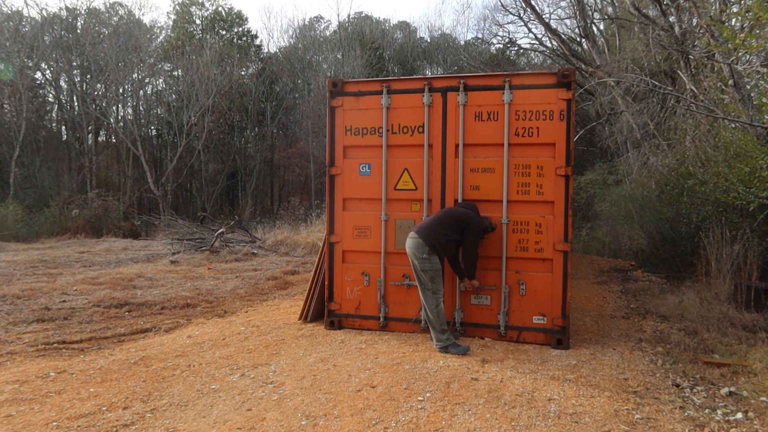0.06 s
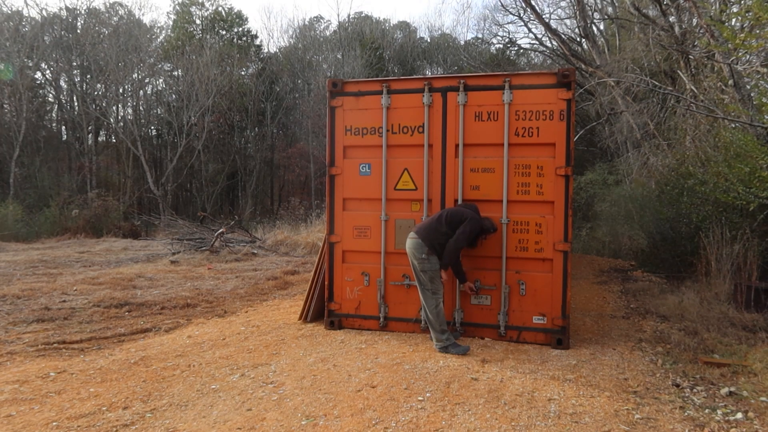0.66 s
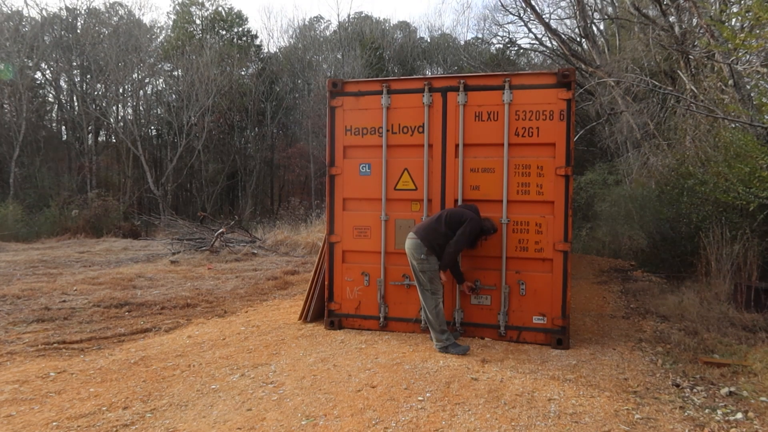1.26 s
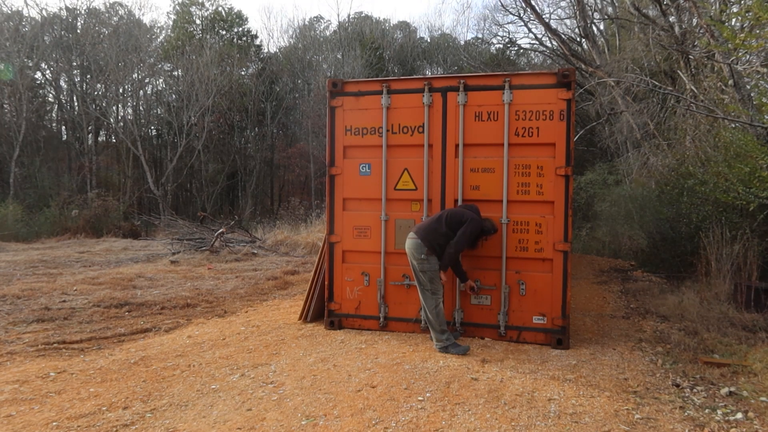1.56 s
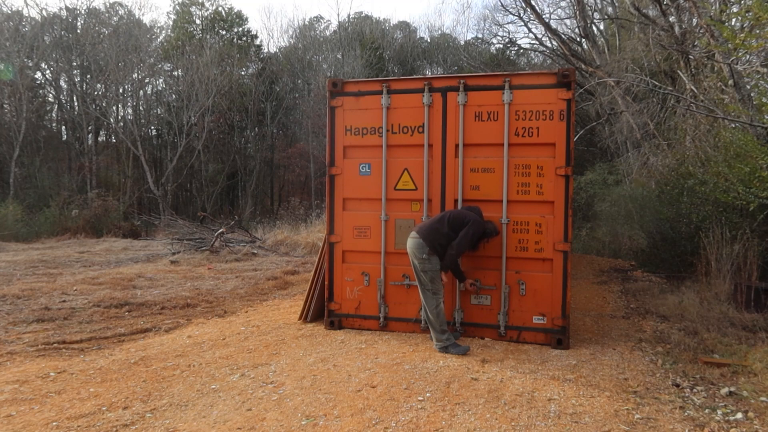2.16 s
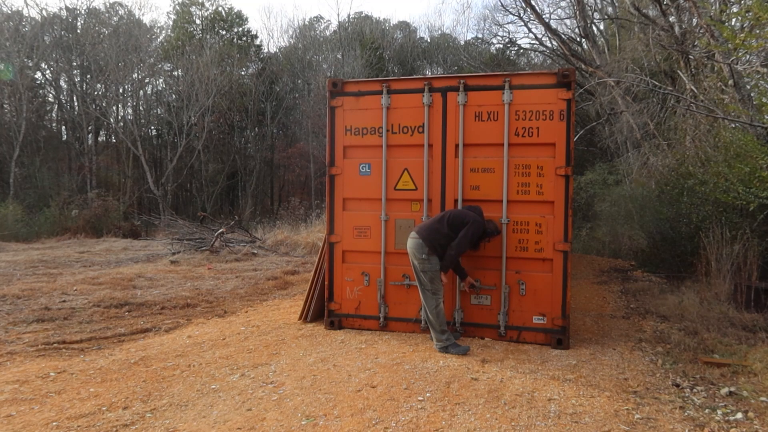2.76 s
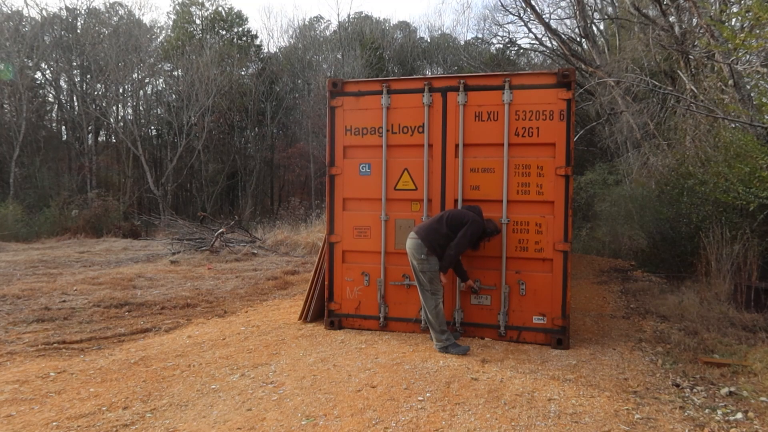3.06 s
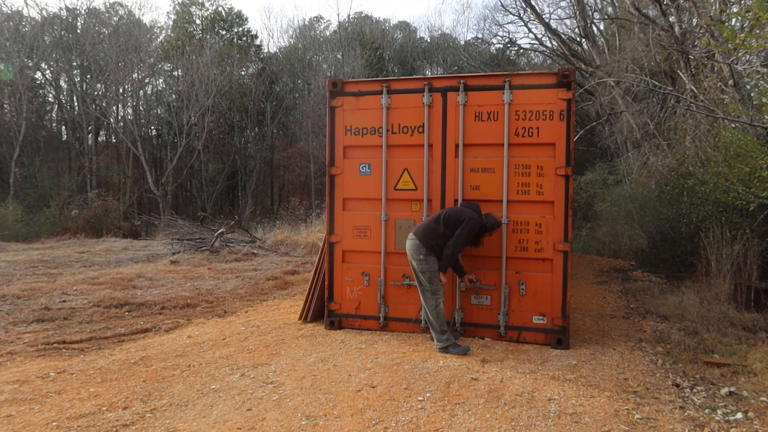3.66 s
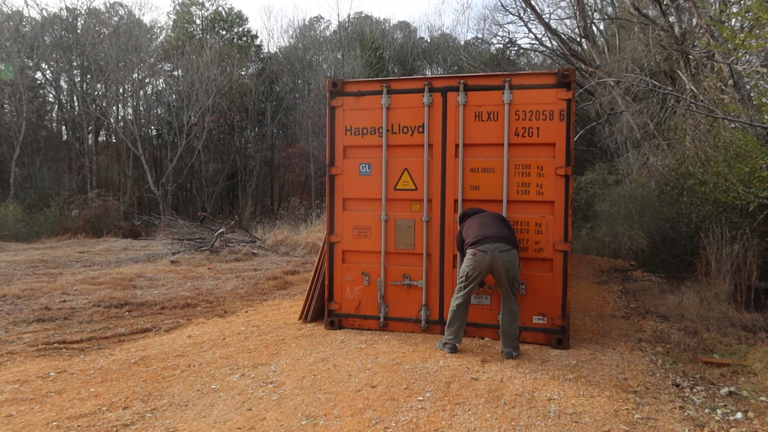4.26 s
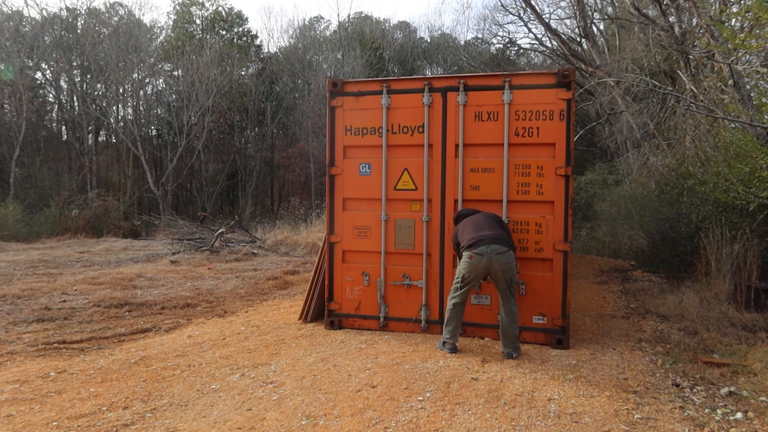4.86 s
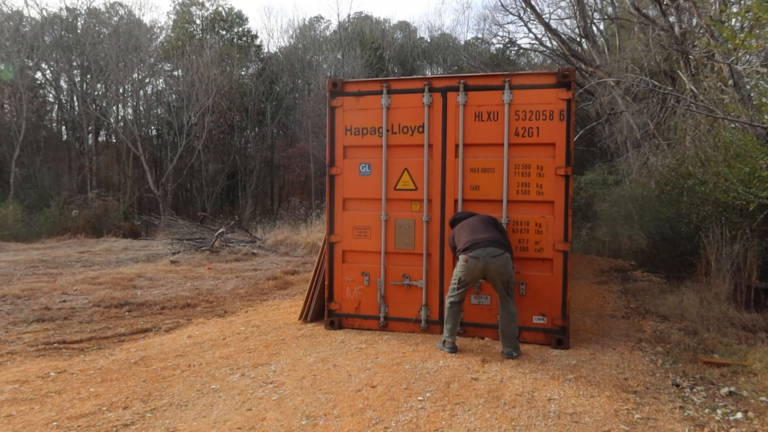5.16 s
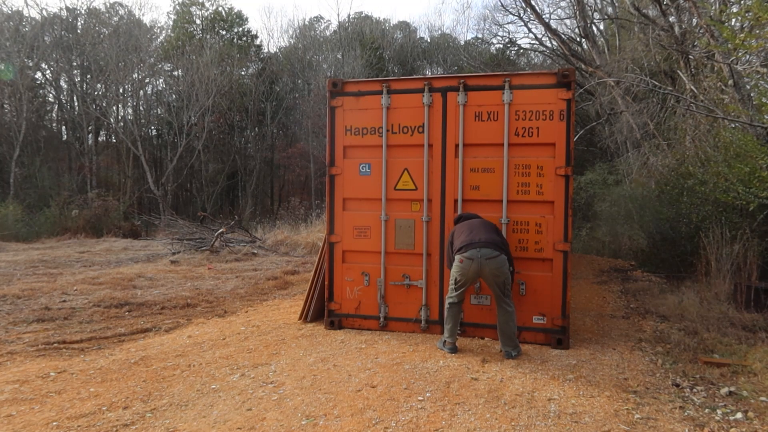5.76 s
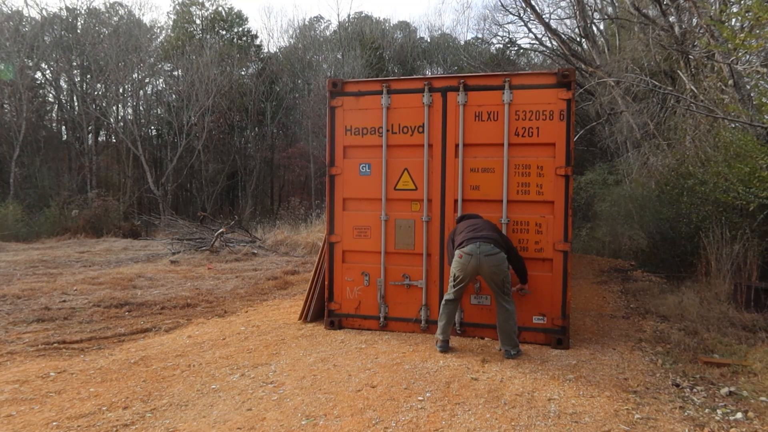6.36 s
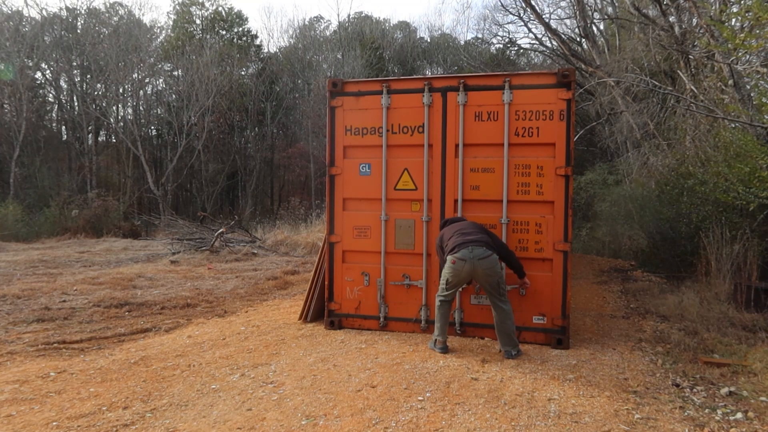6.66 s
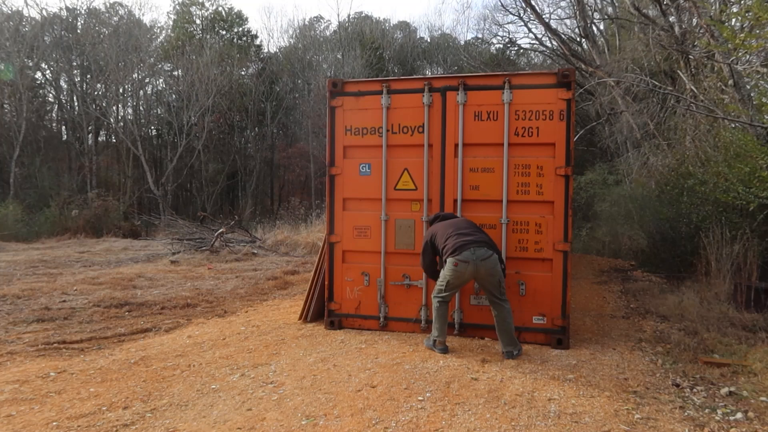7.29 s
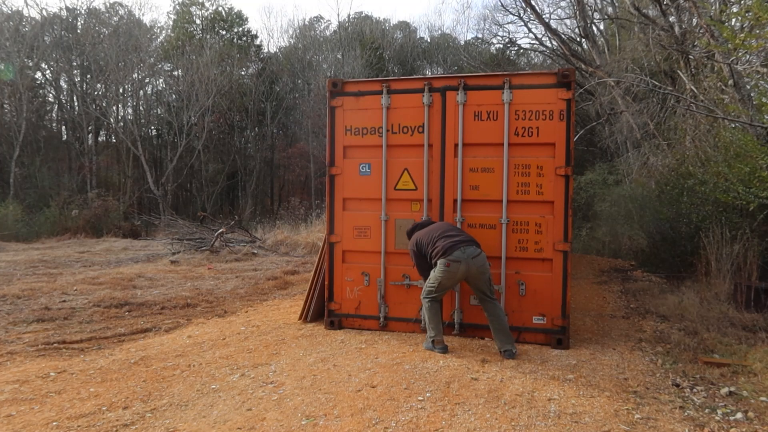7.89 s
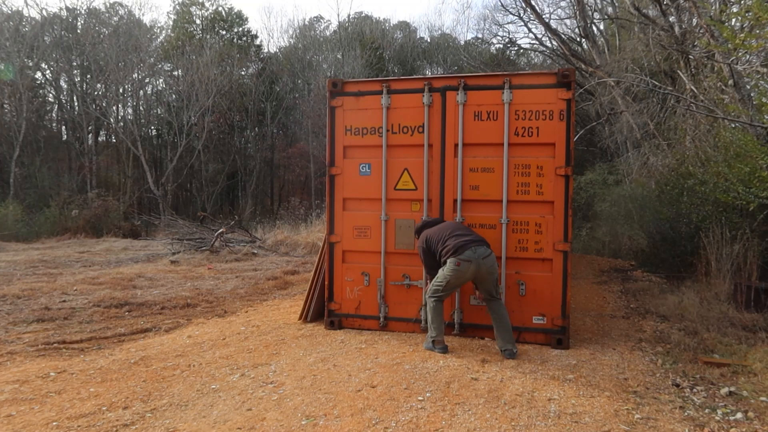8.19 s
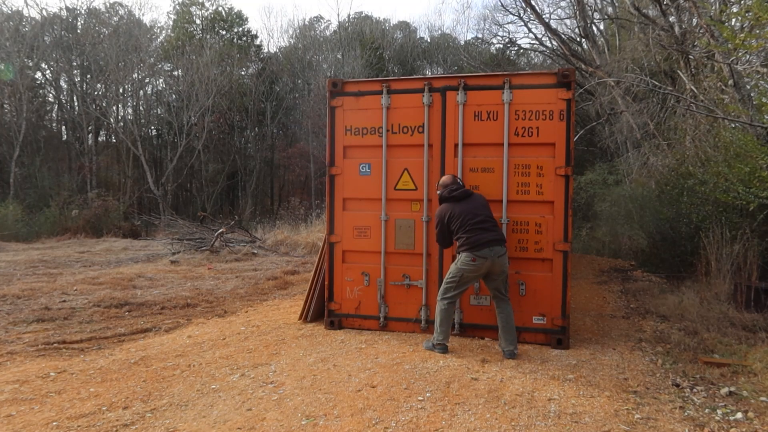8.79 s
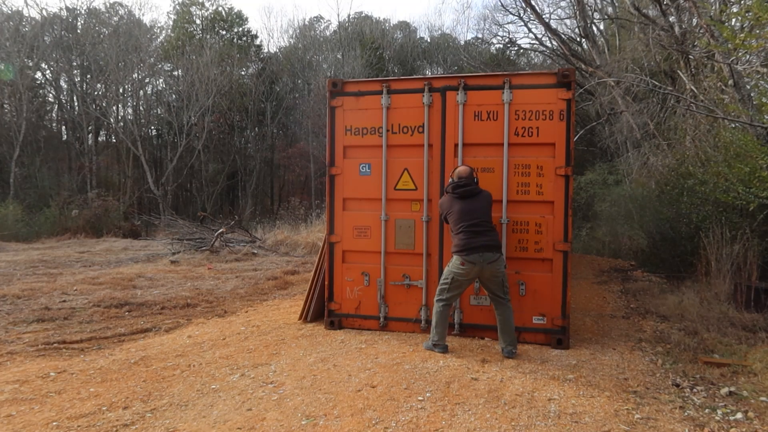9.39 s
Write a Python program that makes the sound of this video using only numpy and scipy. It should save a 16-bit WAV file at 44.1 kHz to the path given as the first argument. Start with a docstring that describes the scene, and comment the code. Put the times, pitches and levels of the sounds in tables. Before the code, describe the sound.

Handles clank and dry locking bars creak and bang on a hollow steel container door outdoors, over a soft rush of trees.

```python
"""A steel shipping container is unlocked in a clearing, over a soft rush from the woods.
Latch plates clink from the start; the hollow box rings after each contact. Handles clank from 2.1 s
and the door leaf booms as it flexes. A bird chirps twice at 4.3 and 4.6 s. From 4.7 s the locking bars
grind in their keepers, the door shifts, dry bearings squeal and levers swing out. Cams knock from
8.2 s, a bar slams home at 8.4 s, and a last push ends at about 9.5 s."""
import sys
import numpy as np
from scipy import signal
from scipy.fft import rfft, irfft, next_fast_len
from scipy.io import wavfile
from scipy.ndimage import uniform_filter1d, map_coordinates

SR = 44100
rng = np.random.default_rng(int(sys.argv[2]) if len(sys.argv) > 2 else 0)


def file_out(sig):
    """Save sig as 16-bit WAV at sys.argv[1]."""
    # one column per channel
    cols = np.atleast_2d(sig).T
    # limit, then scale
    lim = np.clip(cols, -1, 1)
    pcm = np.round(lim * 32767).astype(np.int16)
    wavfile.write(sys.argv[1], SR, pcm)


N = 420713
LOWER_HZ, UPPER_HZ = 863, 1072  # the two bearing notes


def amp(db):
    """Decibels to gain."""
    return 10 ** (np.asarray(db) / 20)


def unit(x):
    """Each row at rms 1."""
    return x / np.sqrt(np.mean(x ** 2, axis=-1, keepdims=True) + 1e-20)


def along(points, hz):
    """(freq_hz, value) points read on a log axis."""
    knots_hz, values = np.transpose(points)
    return np.interp(np.log(hz + 1), np.log(knots_hz + 1), values)


def add(track, start_s, x):
    """Mix x into the track."""
    start = int(np.clip(round(start_s * SR), 0, N))
    track[start:start + len(x)] += x[:N - start]


def wobble(rate_hz, size):
    """Smooth random curve."""
    knots = rng.standard_normal(int(size * rate_hz / SR) + 4)
    return map_coordinates(knots, [np.arange(size) * rate_hz / SR])


def filtered(x, response):
    """Apply the gain response(hz)."""
    size = x.shape[-1]
    padded = next_fast_len(size + 4096)
    return irfft(rfft(x, padded) * response(np.fft.rfftfreq(padded, 1 / SR)), padded)[..., :size]


def ring(modes, t, scatter_db, beating):
    """Damped sines at random strengths, each wavering as if beating with close neighbours."""
    out = np.zeros(len(t))
    for hz, db, t60_s in modes:
        decay = amp(db + scatter_db * rng.normal() - 60 * t / t60_s)
        beat = (1 + beating * wobble(29.6, len(t))) / np.hypot(1, beating)
        out += decay * beat * np.sin(2 * np.pi * hz * t)
    return out


def tail(decay_times, length_s):
    """Diffuse echo of energy 1, decaying by (freq_hz, t60_s) points."""
    hz, t, spectra = signal.stft(rng.standard_normal(length_s * SR), SR, nperseg=256)
    echo = signal.istft(spectra * amp(-60 * t / along(decay_times, hz)[:, None]), SR, nperseg=256)[1]
    return echo / np.linalg.norm(echo)


def woods():
    """Distant rush in the trees over a restless rumble."""
    # rush spectrum: freq_hz, density_db
    spectrum = [(12, -40.5), (20, -8), (91, -2.5), (154, -4.5), (187, -3), (248, -11), (357, -12.5),
                (574, -9), (825, -4.5), (923, -6.5), (1960, -27.5), (2990, -33), (3530, -38), (4670, -39.5),
                (16000, -44.5)]
    # level of the background rush: time_s, gain_db
    rush_level = [(0, 0.5), (1.2, 1), (2.5, 0.5), (4.399, 3), (5.5, -0.5), (6.6, 4.5), (7.3, -2.5),
                  (9.54, 1)]
    air = unit(filtered(rng.standard_normal(N), lambda hz: amp(along(spectrum, hz))))
    rumble = filtered(air, lambda hz: 1 / (1 + (hz / 220) ** 4))
    level_db = -38 + np.interp(np.arange(N) / SR, *np.transpose(rush_level)) + 0.1 * wobble(2, N)
    return amp(level_db) * (air - rumble + rumble * amp(0.25 * wobble(1.3, N)))


def panel_modes(count):
    """Crowded modes of the corrugated door, one undamped wave a row."""
    hz = 50 + 14000 * ((np.arange(count) + rng.random(count)) / count) ** 2
    waves = np.sin(2 * np.pi * hz[:, None] * np.arange(SR * 2 // 3) / SR)
    return waves * (hz[:, None] / hz[-1]) ** (1 / 4)


def steel(panel, clatter, spot_db):
    """A contact favours groups of panel modes by where it lands, and adds loose clatter."""
    favour = amp(spot_db * unit(uniform_filter1d(rng.standard_normal(len(panel)), size=6)))
    clang = unit((favour * rng.standard_normal(len(panel))) @ panel)
    return clang + clatter * rng.standard_normal(panel.shape[1])


def registers(x, tilt_db_oct):
    """The door's low boom, middle clang and high grit, each at rms 1."""
    # door response: freq_hz, density_db
    spectrum = [(18, -25), (30, -43.5), (59, -18), (145, -1.5), (204, -6.5), (415, -7), (499, -7.5),
                (844, -4.5), (1630, -8.5), (2900, -14), (3140, -19), (6210, -32.5), (8520, -33.5),
                (13300, -50.5), (16000, -59)]
    low_hz, high_hz = 450, 4000

    def response(hz):
        boom = 1 / (1 + (hz / low_hz) ** 8)
        below_grit = 1 / (1 + (hz / high_hz) ** 12)
        tilt = amp(tilt_db_oct * np.log2(np.clip(hz, low_hz, high_hz) / low_hz))
        return amp(along(spectrum, hz)) * tilt * np.array([boom, below_grit - boom, 1 - below_grit])
    return unit(filtered(x, response))


def blows(panel, hits, modes, body_db, tilt_db_oct, crack, attack_s, t60s_s, detune=0):
    """Steel on steel: a crack, the door's (boom, clang, grit) dying by t60s_s, and the part's notes."""
    out, t = np.zeros(N), np.arange(panel.shape[1]) / SR
    fade = amp(-60 * t / np.array(t60s_s)[:, None])
    fade[1:] += crack * amp(-60 * t / 0.0063)
    swell = 1 - np.exp(-t / attack_s)  # bending waves spread over the door
    for start_s, level_db, boom_db, grit_db, ring_db in hits:  # last three re level_db
        bands = registers(steel(panel, clatter=0.9, spot_db=2), tilt_db_oct)
        body = (bands * fade * amp([[boom_db], [0], [grit_db]])).sum(0)
        notes = ring(modes, t * (1 + detune * rng.normal()), scatter_db=6.5, beating=0.61)
        add(out, start_s, amp(level_db) * swell * (amp(body_db) * body + amp(ring_db) * notes))
    return out


def latches(panel):
    """Loose latch plates tap, then touch again more weakly."""
    # plate taps: start_s, level_db, grit_db
    contacts = [(0.093, -35, -13), (0.1395, -22.5, -12), (0.2267, -16.5, -16.5), (0.428, -33, -12),
                (0.5569, -26.5, -16), (0.611, -28, -16), (0.7436, -31.5, -30), (0.7894, -22, -29),
                (0.8775, -26.5, -10.5), (1.0957, -35.5, -34), (1.1633, -35.5, -33), (1.728, -27.5, -26),
                (2.447, -35.5, -12), (2.6075, -38.5, -9), (2.7656, -27.5, -10.5), (3.2593, -29, -25),
                (3.313, -36.5, -7), (3.373, -36.5, -4), (3.5055, -22.5, -7.5), (4.046, -32.5, -15),
                (4.142, -33, -26), (4.9136, -13, -12.5), (5.04, -17.5, -12)]
    # plate modes: freq_hz, level_db, t60_s
    modes = [(1650, -6, .06), (2050, -7, .05), (2400, -5, .06), (2750, -5, .06), (2950, -4, .07),
             (3700, -12, .04), (6150, -16, .04), (7400, -15, .03)]
    boom_db, ring_db, rattle_s, rattle_db = -14, -13, 0.02, -10.5
    taps = [(start_s, db, boom_db, grit_db, ring_db) for start_s, db, grit_db in contacts]
    rattles = [(start_s + rattle_s * np.exp(0.3 * rng.normal()), db + rattle_db, *colour)
               for start_s, db, *colour in taps]
    return blows(panel, taps + rattles, modes, body_db=-6, tilt_db_oct=0, crack=0.91,
                 attack_s=0.00075, t60s_s=(0.43, 0.24, 0.061), detune=0.04)


def box_notes(x):
    """The empty container's walls ring on at their own pitches."""
    # wall modes: freq_hz, level_db, t60_s
    modes = [(71, -6, 1.2), (152, -8, 1.4), (176, -6, 1.8), (272, -6, 1.8), (322, -4, 1.6), (422, -8, 2.8),
             (441, -5, 2.8), (612, -6, 1.2), (788, -7, 1), (872, -10, 1.5), (1074, -1, 1.6), (1305, -8, .7),
             (1612, -7, .9), (3213, -7, .8)]
    notes = ring(modes, np.arange(2 * SR) / SR, scatter_db=0.5, beating=0.75)
    return signal.fftconvolve(x, notes / SR * 100)[:N]


def box_echo(x):
    """Sound rolls around inside the container and leaks out."""
    # echo decay: freq_hz, t60_s
    decay_times = [(60, 2.2), (200, 3.62), (450, 1.23), (1000, 0.91), (2000, 1.94), (4000, 0.59),
                   (12000, 0.47)]
    # echo colour: freq_hz, gain_db
    colour = [(40, 8.5), (150, -0.5), (400, 2.5), (1000, 3), (2500, -16), (5000, -1.5), (14000, -14.5)]
    echo = filtered(tail(decay_times, length_s=2), lambda hz: amp(along(colour, hz)))
    return signal.fftconvolve(x, np.pad(echo, (SR // 80, 0)))[:N]


def handles(panel):
    """Handles clank and ring high."""
    # clanks: start_s, level_db, boom_db, grit_db, ring_db
    hits = [(2.094, -18.5, 1, -16.5, -25), (2.115, -29, 8, -6.5, -32), (3.144, -16.5, -2.5, -8, -40),
            (3.564, -9.5, -9, -8, -15), (3.604, -15, -4.5, -11.5, -11), (4.682, -27.5, -1, -2, -34),
            (4.776, -8.5, -3, -13.5, -42), (4.948, -9.5, -13, -12.5, -23)]
    # handle modes: freq_hz, level_db, t60_s
    modes = [(2853, -4, .15), (5600, -16, .08), (6900, -4, .08), (7020, -3, .07), (7140, -5, .07),
             (13200, -26, .15), (13800, -18, .1)]
    return blows(panel, hits, modes, body_db=-6.5, tilt_db_oct=0.5, crack=0.27,
                 attack_s=0.0012, t60s_s=(0.27, 0.24, 0.092))


def flexing(t60_s, attack_s):
    """The door leaf bends against its rubber seal: a short, low boom."""
    # flexes: start_s, pitch_hz, level_db
    flexes = [(2.105, 62, -24), (2.118, 155, -21), (3.62, 162.4, -23), (6.11, 88.6, -17.5),
              (6.784, 58.7, -9), (9.514, 194, -10.5)]
    out, t = np.zeros(N), np.arange(SR // 2) / SR
    swell = 1 - np.exp(-t / attack_s)
    for start_s, hz, db in flexes:
        add(out, start_s, amp(db - 60 * t / t60_s) * swell * np.sin(2 * np.pi * hz * t))
    return out


def bird():
    """Two arched, falling chirps, strongest in the second harmonic, echoed by the trees."""
    # calls: start_s, level_db
    chirps = [(4.314, -35), (4.582, -34)]
    top_hz, top_s, length_s, drop = 1390, 0.0128, 0.056, 0.37
    out, t = np.zeros(N), np.arange(int(length_s * SR)) / SR
    hz = top_hz * (1 - drop * ((t - top_s) / (length_s - top_s)) ** 2)
    swell = np.sin(np.pi * t / length_s) ** 2
    for start_s, level_db in chirps:
        phase = 2 * np.pi * np.cumsum(hz * (1 + 0.0068 * wobble(120, len(hz)))) / SR
        tone = sum(amp(db) * np.sin(k * phase) for k, db in enumerate([-9, -4, -20, -30], 1))
        add(out, start_s, swell * amp(level_db) * tone)
    trees = tail([(1000, 0.45), (6000, 0.3)], length_s=1)
    return out + amp(-4.5) * signal.fftconvolve(out, trees)[:N]


def push(rise_s, hold_s, t60_s, swell_db=18.5):
    """Time and gain of one hand push: swells evenly in dB, holds, dies away."""
    t = np.arange(int((rise_s + hold_s + t60_s) * SR)) / SR
    db = -swell_db * np.maximum(1 - t / rise_s, 0) - 60 * np.maximum(t - rise_s - hold_s, 0) / t60_s
    return t, amp(db) * np.minimum(t / 0.004, 1)


def grinding(panel, slips_per_s, slip_t60_s, level_db, contacts):
    """The turning bars stick and slip at several contacts; each slip jolts the door and the rods."""
    # pushes: start_s, rise_s, hold_s, t60_s, grind_db, shudder_re_grind_db, grit_re_grind_db
    strokes = [(4.661, 0.029, 0.0067, 0.51, -20.5, 0, -32), (4.751, .012, 0.044, 0.83, -21.5, -8.5, -18),
               (4.87, 0.087, 0.016, 1, -34.5, -8, -19), (5.266, 0.031, 0.026, 0.28, -6.5, -14, -27.5),
               (5.396, 0.054, 0.012, 0.25, -23, 2, -24.5), (6.075, 0.016, 0.057, 0.32, -19.5, -6, -22.5),
               (6.775, 0.057, 0.23, 0.59, -16, 1, -23.5), (7.313, 0.05, 0.087, 0.31, -22, -28.5, -20),
               (7.7, 0.077, 0.083, 0.63, -15, -0.5, -27.5), (8.245, 0.079, 0.043, 0.62, -24, 0.5, -40),
               (8.419, 0.056, 0.011, 0.97, -16, -9.5, -17.5), (9.479, .04, 0.042, .3, -15, -5, -31)]
    # rod modes: freq_hz, level_db, t60_s
    rod_modes = [(7050, -2, .06), (8350, 4, .02), (13200, -14, .08)]
    uneven_db, flake_db, squeak_db, squeak_swing_db = 2.5, 2.5, -10.5, 8
    t, jolts = np.arange(SR // 8) / SR, np.zeros(N)
    for _ in range(contacts):
        slips = rng.random(N) < slips_per_s / contacts / SR
        strength = amp(uneven_db * np.clip(rng.standard_normal(N), -2, 2))
        jolt = steel(panel, clatter=0.63, spot_db=2.5)[:len(t)] * amp(-60 * t / slip_t60_s)
        jolts += signal.oaconvolve(slips * strength, jolt)[:N]
    bands = registers(jolts, tilt_db_oct=-1.6)
    bands[2] *= amp(flake_db * wobble(90, N))  # rust flakes off in ticks
    squeaks = unit(signal.oaconvolve(jolts, ring(rod_modes, t, scatter_db=2, beating=0.3))[:N])
    bands[2] += squeaks * amp(squeak_db + squeak_swing_db * wobble(50, N))
    bands /= np.sqrt(np.abs(uniform_filter1d(bands ** 2, SR // 14, axis=1)) + 1e-6)  # steady rms
    shudder, grind, grit = drive = np.zeros((3, N))
    for start_s, rise_s, hold_s, t60_s, db, shudder_db, grit_db in strokes:
        _, gain = push(rise_s, hold_s, t60_s)
        add(shudder, start_s + 0.0093, amp(db + shudder_db) * gain)  # the heavy leaf lags
        add(grind, start_s, amp(db) * gain)
        add(grit, start_s, amp(db + grit_db) * gain ** 1.32)  # grit grows faster than force
    return amp(level_db) * (drive * bands).sum(0)


def door_shifts(panel):
    """The door thuds in its frame."""
    # thuds: start_s, level_db, boom_db, grit_db, ring_db
    hits = [(4.761, -8, 0, -28, -1), (5.293, 2.5, -18, -30, -28), (5.361, -2, -19, -20, -19),
            (6.124, -12.5, 4.5, -26, -22), (6.634, -22, -10, -15, -24.5), (6.823, -13.5, 8, -5, -22),
            (6.997, -5.5, 9.5, -36, -11.5), (7.832, 0.5, 0.5, -13.5, -23.5), (7.911, -6.5, 5, -18.5, -29),
            (9.513, -5, 4, -40, -32)]
    # door modes: freq_hz, level_db, t60_s
    modes = [(62, -13, 0.47), (331.4, -2, 0.15), (400, -6.5, 0.2), (1586, -10, 0.089)]
    return blows(panel, hits, modes, body_db=-11.5, tilt_db_oct=0.5, crack=0.36,
                 attack_s=0.002, t60s_s=(0.15, 0.086, 0.08))


def squeals(jitter, flutter_db, even_db, edge_hz, harmonics):
    """Slips in a dry bearing lock into an odd-rich tone that roughens and brightens as it binds."""
    # squeals at the bearing notes, subharmonics or pitches of their own:
    # start_s, rise_s, hold_s, t60_s, pitch_hz, level_db, roughness, fall_db_oct
    events = [(5.247, 0.014, 0.022, .07, LOWER_HZ, -8.5, 0.38, 8.5),
              (5.29, 0.045, 0.042, 0.3, LOWER_HZ / 2, -17, .45, 12),
              (5.295, 0.02, 0.027, 0.31, 1625, -17, 0.62, 16),
              (5.3, 0.024, 0.027, 0.71, UPPER_HZ, -24.5, .7, 16.5),
              (5.358, 0.006, 0.0031, 0.054, 3200, -16.5, 0.3, 20),
              (6.71, 0.034, .012, 0.22, 847, -25, 0.16, 25),
              (7.292, 0.072, 0.026, 0.12, UPPER_HZ, -8, 0.18, 12),
              (7.388, 0.025, .02, .22, UPPER_HZ, -14, 0.2, 6.5),
              (7.347, 0.071, 0.061, 0.16, 269, -29.5, .14, -2.5),
              (7.74, 0.05, 0.03, 0.34, 787, -18, 0.52, 16), (9.487, 0.022, .04, .2, 762, -10, 0.3, 20)]
    chatter_rise_s, brighten_db_oct_per_s = 0.053, 25
    out = np.zeros(N)
    for start_s, rise_s, hold_s, t60_s, hz, db, roughness, fall_db_oct in events:
        t, gain = push(rise_s, hold_s, t60_s)
        depth = roughness * np.minimum(t / chatter_rise_s, 1) ** 2
        chatter = lambda rate_hz: depth * wobble(rate_hz, 2 * SR)[:len(t)]
        phase = 2 * np.pi * np.cumsum(hz * (1 + jitter * chatter(226))) / SR
        slope_db_oct = np.maximum(fall_db_oct - brighten_db_oct_per_s * (t - rise_s), 0)
        for k in range(1, harmonics + 1):
            overtone_db = -slope_db_oct * np.log2(k) + even_db * (k % 2 == 0) + flutter_db * chatter(132)
            radiated = 1 / (1 + (k * hz / edge_hz) ** 8)
            add(out, start_s, gain * radiated * amp(db + overtone_db) * np.sin(k * phase))
    return out


def levers(panel):
    """Levers swing out and clang."""
    # clangs: start_s, level_db, boom_db, grit_db, ring_db
    hits = [(6.08, -18, -23, -8, -2.5), (6.409, -15.5, -9.5, -27, -16), (7.269, -17.5, -27, -11.5, -33.5)]
    # lever modes: freq_hz, level_db, t60_s
    modes = [(1660, -2, .2), (2430, -3, .35), (3090, -2, .35), (3500, -8, .2), (5270, -23, .2)]
    return blows(panel, hits, modes, body_db=-7, tilt_db_oct=3, crack=0.19,
                 attack_s=0.0009, t60s_s=(0.79, 0.28, 0.14))


def cams(panel):
    """Cams knock and ring."""
    # knocks: start_s, level_db, boom_db, grit_db, ring_db
    hits = [(8.159, -25.5, 6, -34, -28), (8.285, -25, -9.5, -33, -8), (8.978, -17, 0, -24, -21),
            (9.466, -19.5, 5, -24, -20.5), (9.492, -17.5, 4, -27, -17)]
    # cam modes: freq_hz, level_db, t60_s
    modes = [(2200, -10, .45), (3310, -3, .2), (3440, -5, .2), (4560, -27, .25), (5040, -15, .3),
             (5320, -29, .8)]
    return blows(panel, hits, modes, body_db=-10.5, tilt_db_oct=3.5, crack=0.36,
                 attack_s=0.00042, t60s_s=(0.1, 0.23, 0.083))


def bar_slam(panel):
    """A locking bar slams home with a bright crack."""
    # impacts: start_s, level_db, boom_db, grit_db, ring_db
    hits = [(8.39, 2.5, -5.5, -1.5, -20), (8.484, -12.5, 5, -15, -54)]
    # bar modes: freq_hz, level_db, t60_s
    modes = [(1540, 3, .1), (1635, 1, .1), (2440, -1, .1), (2660, 1, .1), (3250, -2, .3), (3887, -6, .12),
             (7714, -21, 1.35), (8366, -11, .35), (8620, -15, .3), (9293, -15, .3), (10010, -14, .3),
             (10600, -17, .3), (12770, -22, .42)]
    return blows(panel, hits, modes, body_db=-9.5, tilt_db_oct=5.5, crack=1.0,
                 attack_s=0.000089, t60s_s=(0.2, 0.18, 0.046))


def scene():
    """The door, the box that answers it and the clearing, in mono."""
    panel = panel_modes(count=320)
    door = latches(panel) + handles(panel) + levers(panel) + cams(panel)
    door += door_shifts(panel) + bar_slam(panel)
    door += grinding(panel, slips_per_s=520, slip_t60_s=0.071, level_db=-3, contacts=6)
    squeal = squeals(jitter=0.08, flutter_db=9, even_db=-8, edge_hz=3200, harmonics=11)
    notes = box_notes(amp(-12) * door + amp(-20) * squeal)
    echo = box_echo(amp(-9.5) * door + amp(-7) * squeal)
    return (door + squeal + flexing(t60_s=0.43, attack_s=0.01) + notes + echo + bird() + woods())[None]


def record(dry):
    """Soft clip at full scale, then a band limit."""
    rounded = dry / (1 + np.abs(dry) ** 6) ** (1 / 6)
    return filtered(rounded, lambda hz: hz < 15900)


dry = scene()
out = record(dry)
file_out(out)
```